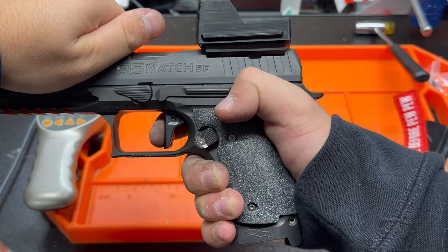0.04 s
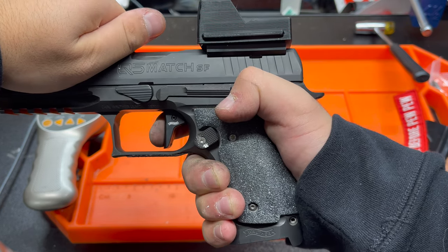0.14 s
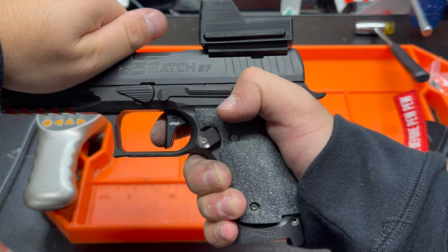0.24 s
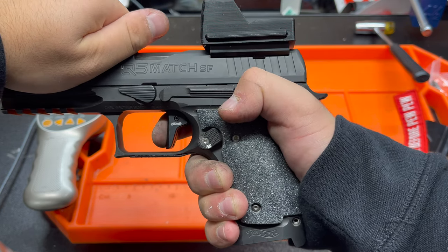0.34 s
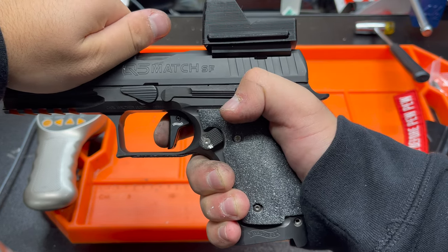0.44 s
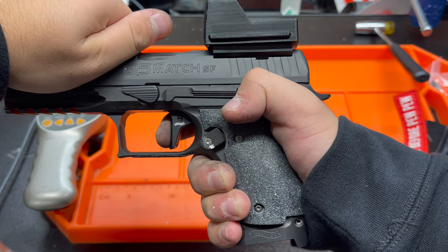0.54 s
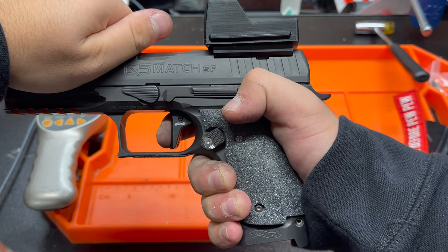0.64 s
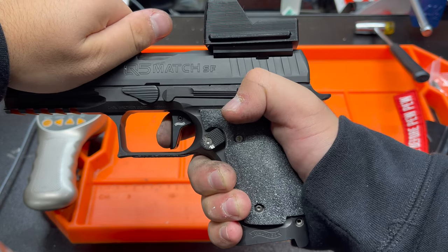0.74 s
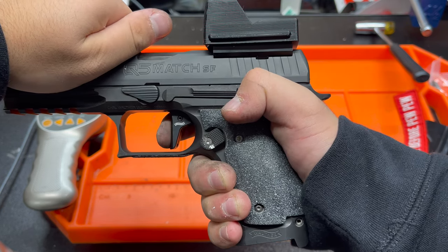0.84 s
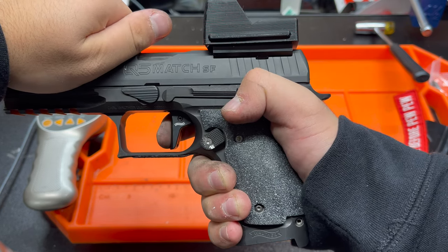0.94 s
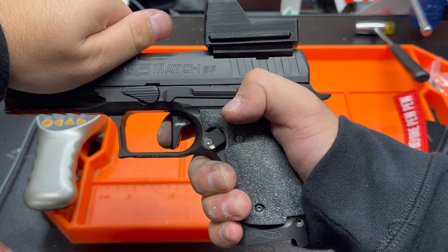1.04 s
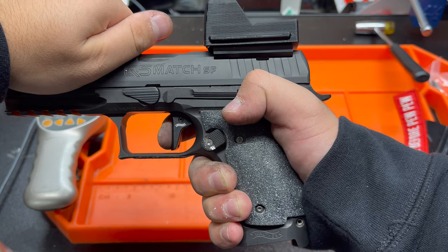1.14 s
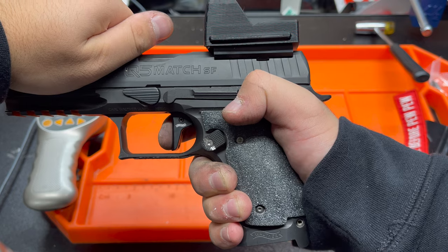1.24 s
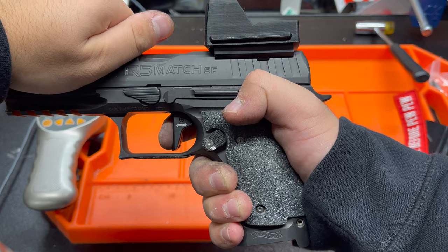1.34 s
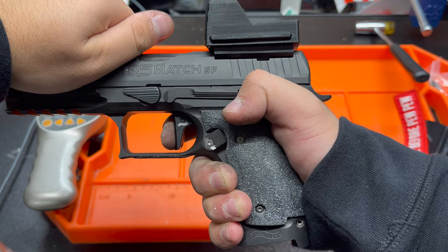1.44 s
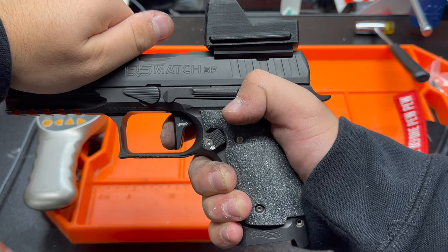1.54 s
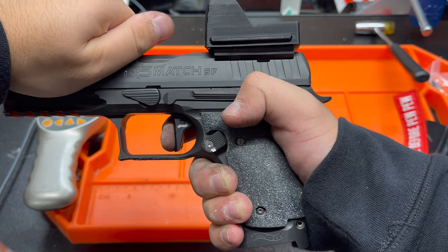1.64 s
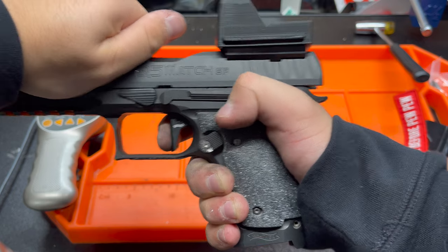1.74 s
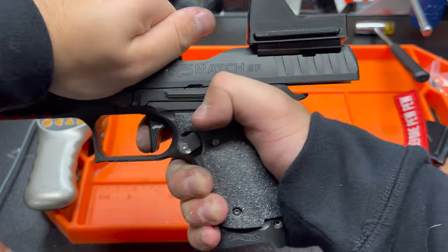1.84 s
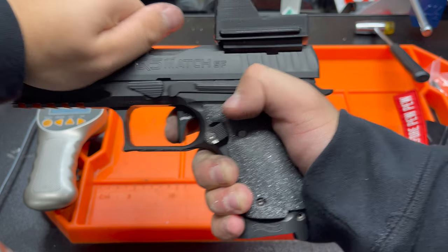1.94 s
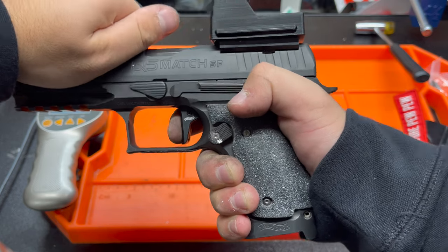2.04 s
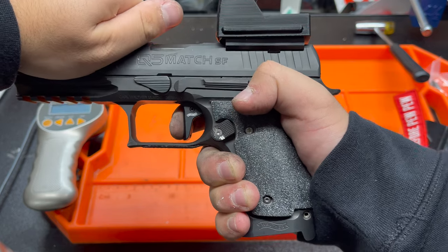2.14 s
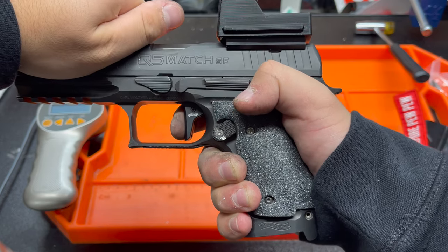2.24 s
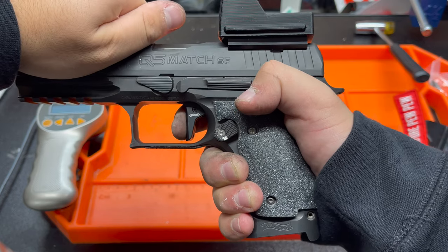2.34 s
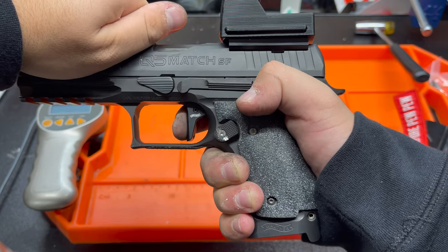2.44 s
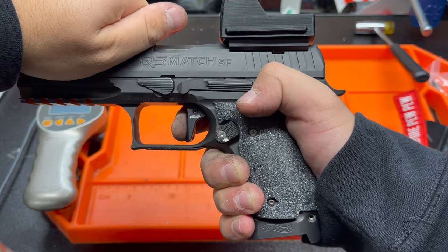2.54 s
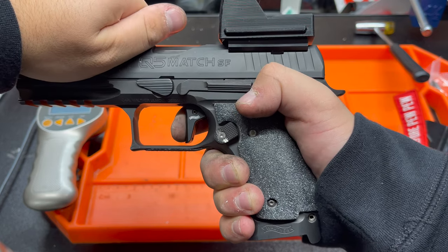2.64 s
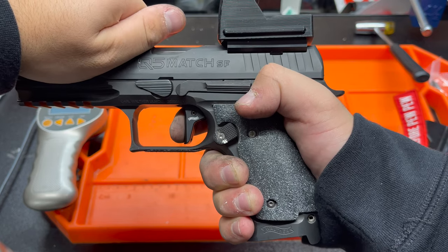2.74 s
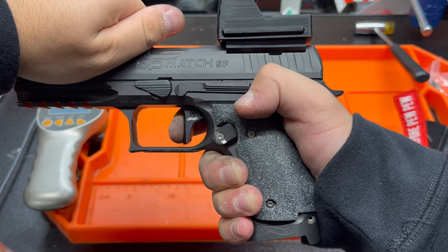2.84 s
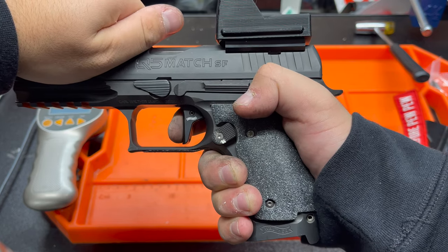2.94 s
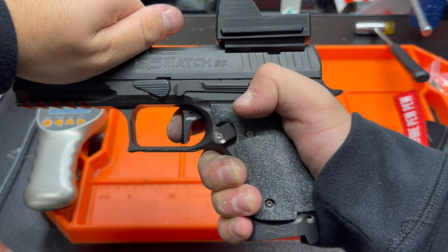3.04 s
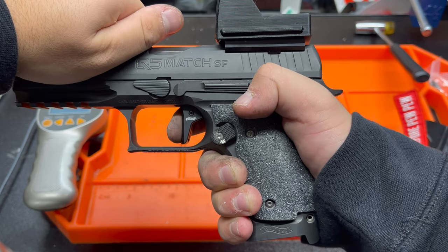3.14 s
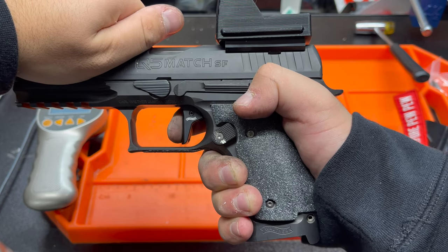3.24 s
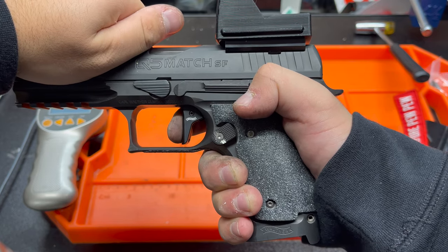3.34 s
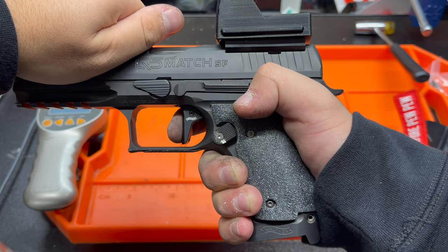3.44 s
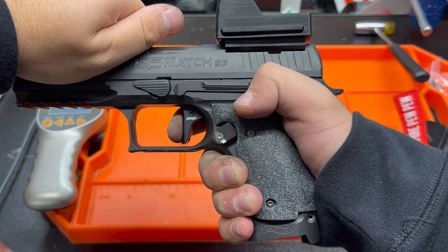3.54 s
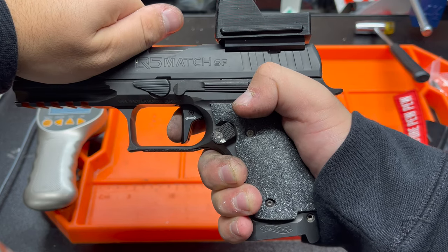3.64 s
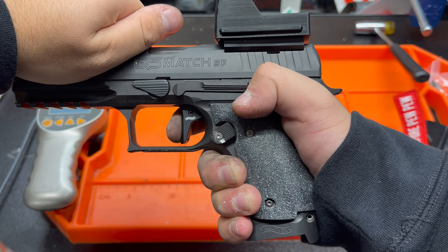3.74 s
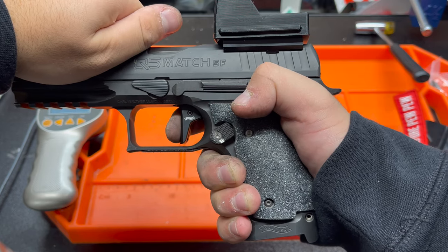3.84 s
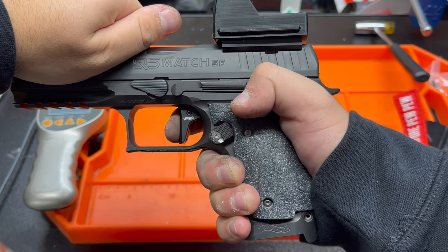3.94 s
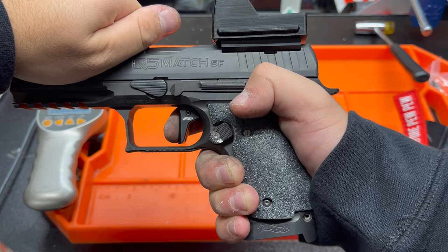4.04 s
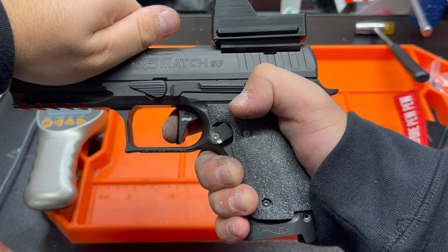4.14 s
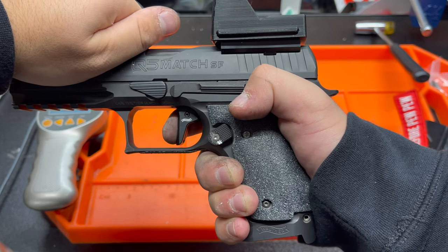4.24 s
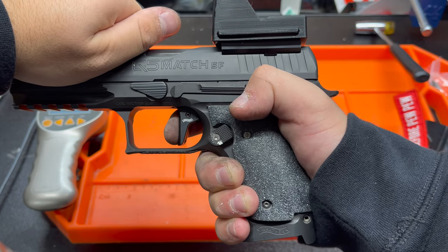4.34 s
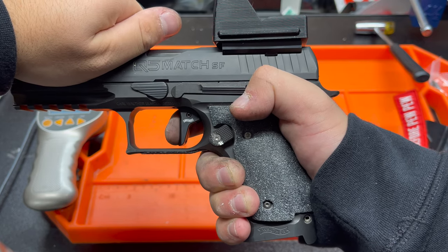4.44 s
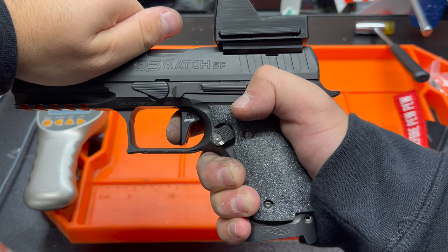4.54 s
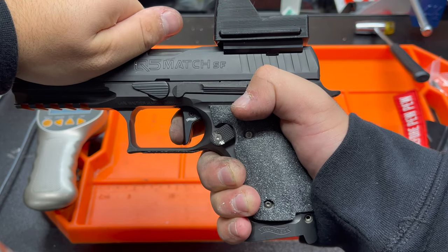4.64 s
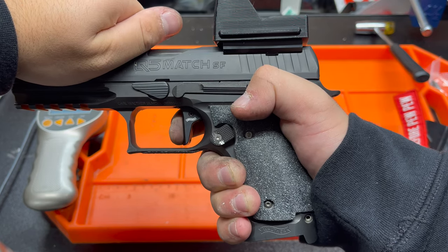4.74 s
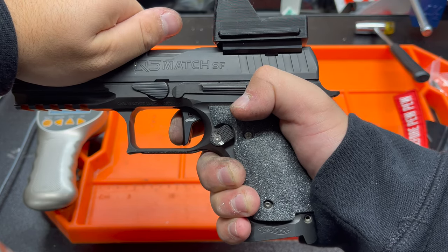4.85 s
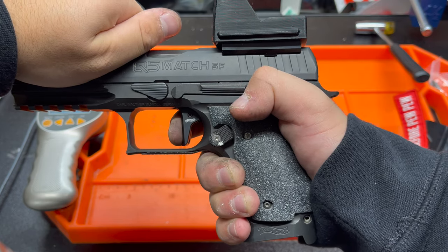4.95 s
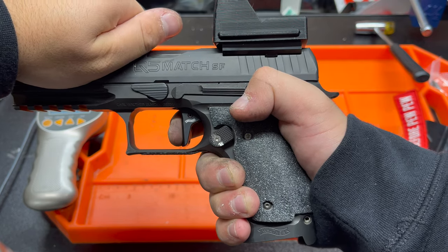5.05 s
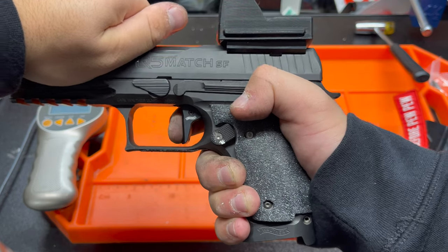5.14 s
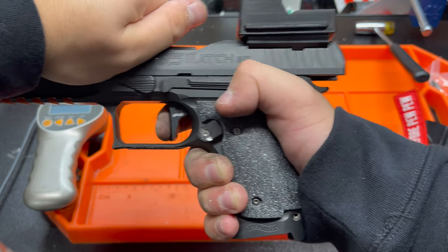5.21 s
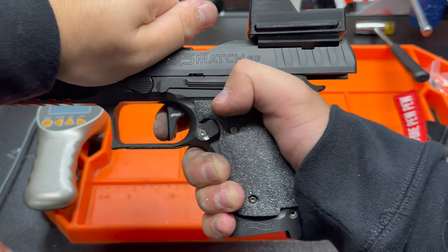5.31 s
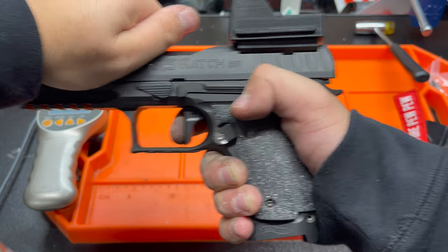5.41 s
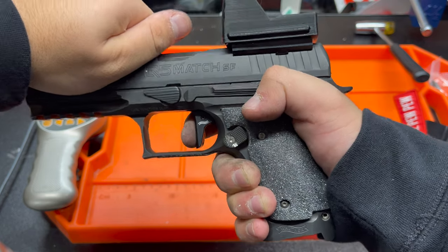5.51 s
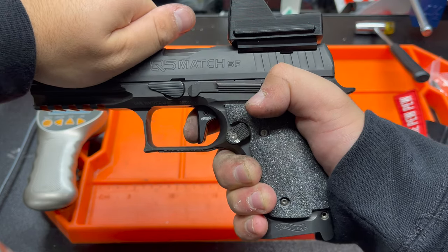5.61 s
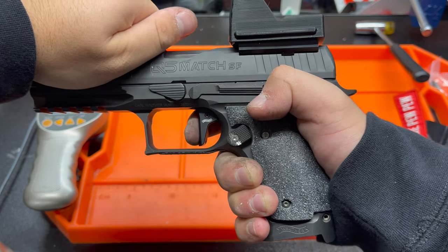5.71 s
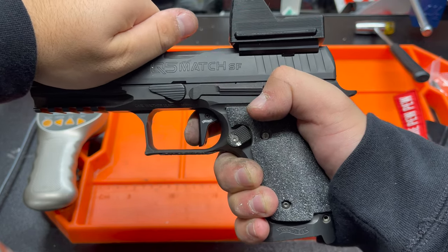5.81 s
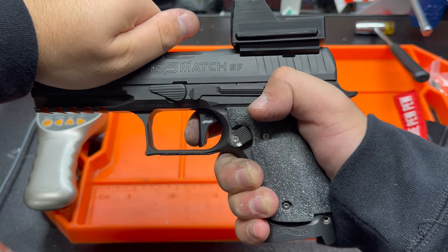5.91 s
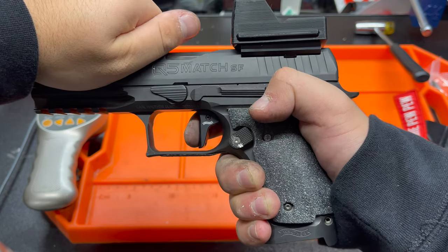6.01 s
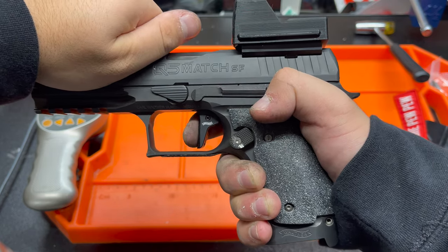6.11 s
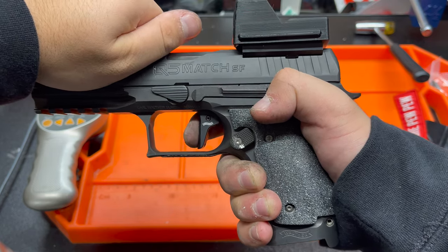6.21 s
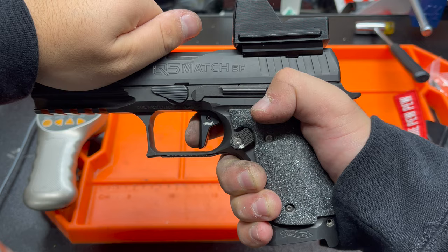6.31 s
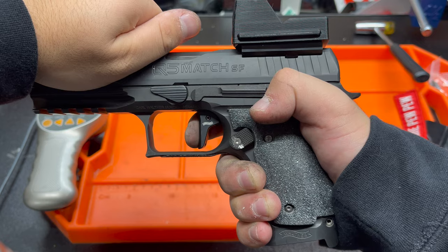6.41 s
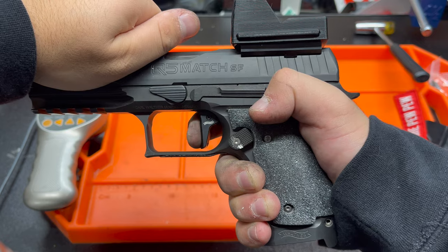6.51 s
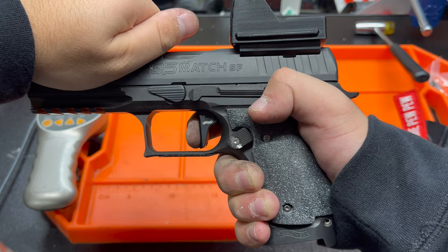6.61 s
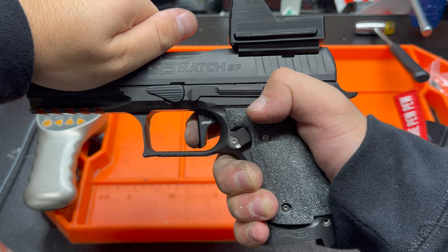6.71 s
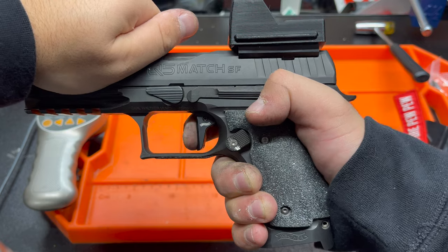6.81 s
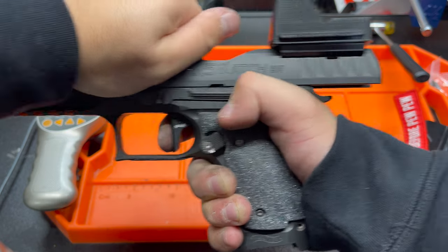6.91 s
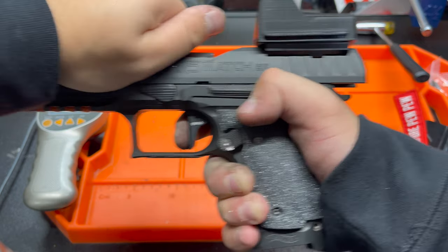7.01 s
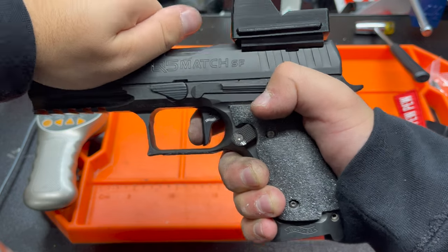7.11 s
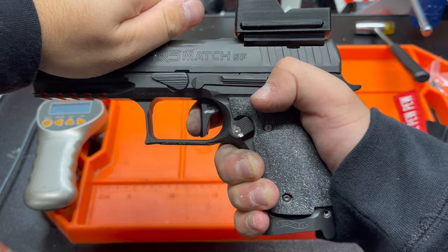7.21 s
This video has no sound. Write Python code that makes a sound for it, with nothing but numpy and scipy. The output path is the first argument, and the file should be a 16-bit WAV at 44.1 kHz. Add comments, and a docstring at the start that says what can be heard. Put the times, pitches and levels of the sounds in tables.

```python
"""A tick over faint mains hum and room tone: the trigger of a pistol resets, close to two microphone ports.
The striker then falls with a crack, and the slide is racked back and slams shut, in a small hard room.
Each contact is a few milliseconds of chatter that rings the modes of frame and slide; sliding steel is grit
through the same modes. Bench thuds, spring twang and soft low-mid noise swells lie under them; noise tails
are the room. A gain control ducks the loud passages."""
import sys
import numpy as np
from scipy import signal
from scipy.fft import rfft, irfft
from scipy.io import wavfile

SR = 44100
rng = np.random.default_rng(int(sys.argv[2]) if len(sys.argv) > 2 else 0)


def generate_wav(signal):
    """Clip the signal to [-1, 1] and save it as 16-bit WAV at the path in sys.argv[1]."""
    frames = np.transpose(np.atleast_2d(signal))
    scaled = np.clip(frames, -1, 1) * 32767
    pcm = np.round(scaled).astype(np.int16)
    wavfile.write(sys.argv[1], SR, pcm)


N = 320607

# Quickly damped modes of the gripped pistol: (frequency [Hz], relative level [dB], t60 [s])
LOW_MODES = [(904, -7.5, 0.0088), (1130, -0.5, 0.012), (1395, 4.5, 0.012), (1720, 0.5, 0.011),
             (2069, 4, 0.011), (2379, 3.5, .008), (2804, -1.5, 0.011)]
MIDDLE_MODES = [(3185, 0.53, 0.0034), (3780, -2.5, 0.0069), (4263, 0, 0.0059), (4903, -0.34, 0.0058),
                (5350, 0.96, .004), (6060, -1, .006), (6270, -2, 0.0098), (7000, -2, 0.0027)]
HIGH_MODES = [(7550, -10, 0.0034), (7587, -11, 0.0063), (8623, 0.5, 0.002), (8580, -16.5, 0.011),
              (9557, 8, 0.003), (10100, -3.5, 0.0061), (10700, -4, 0.0084), (12260, -14.5, 0.0072),
              (15000, -4.5, .004)]
# The steel slide's clink and its long thin rings: (frequency [Hz], relative level [dB], t60 [s])
SLIDE_RINGS = [(11040, 4, 0.02), (11540, -5, 0.003), (11260, -23, .24), (9080, -49, 0.7), (8560, -57, .8),
               (7800, -53, .7), (3870, -48, 1.2), (2862, -37, .9)]
# Small parts radiate little below: (low modes [Hz], middle modes [Hz], high modes [Hz], rings [Hz])
RADIATES_ABOVE_HZ = (700, 2411, 5900, 5930)
NEARNESS_DB = 14.5   # gain from a blow's energy to the level at the ports


def contacts():
    """Every contact is a short chatter that strikes all modes; rows: left, right, sound sent to the walls."""
    size = 3 * SR // 4
    mode_tables = (LOW_MODES, MIDDLE_MODES, HIGH_MODES, SLIDE_RINGS)
    groups = [radiated(modes, hz, size) for modes, hz in zip(mode_tables, RADIATES_ABOVE_HZ)]
    out = np.zeros((3, N + SR))
    ms = np.arange(1500) / SR * 1000
    for s, blow_db, low_db, middle_db, chatter_ms, ring_db, rise_ms in blows():
        shape = (1 - np.exp(-ms / rise_ms)) * np.exp(-(ms / chatter_ms) ** 2)
        chatter = grit(len(ms), uneven_db=2.5) * shape
        chatter /= np.sqrt(np.sum(chatter ** 2, axis=1, keepdims=True))
        # each blow strikes the modes a little differently; neighbours swing in opposite directions
        strengths = [from_db(rng.normal(0, 1.5, len(g))) * alternating(len(g)) for g in groups]
        low, middle, high, rings = [strength @ group for strength, group in zip(strengths, groups)]
        lower = from_db(low_db) * low + from_db(middle_db) * middle
        upper = high + from_db(ring_db) * rings
        sound = at_ports(chatter, lower, upper)
        at = round(s * SR)
        gain = from_db(blow_db + NEARNESS_DB)
        out[:2, at:at + sound.shape[1]] += gain * sound
        # averaged over all directions the chatter leaves no colour
        out[2, at:at + size] += gain * (lower + upper)
    return out[:, :N]


# Voice of a contact: (low modes re blow [dB], middle modes re blow [dB], chatter [ms], ring re blow [dB])
RESET_VOICE = (-15, -8.5, 3.4, -7.5)
SLIP_VOICE = (-14, -10, 4.5, -13)
STRIKER_VOICE = (-19, -9, 6, -9.5)
TICK_VOICE = (-8, -6, 4.5, -13)   # its lower modes are shifted by each tick's dullness
# Voices in the same columns, one row a stage: slack, unlock, barrel drops, striker catches
OPENING_VOICES = [(-14, -9, 2.5, -7), (-5, -3.5, 7.5, -10), (-8, -6.5, 8.5, -4), (-15.5, -2.8, 4.5, 0.4)]
# Likewise: barrel lifts, locks, slide seats
CLOSING_VOICES = [(-6, -4, 4, -6.5), (-14, -6, 4, -11), (-14, -4.7, 4.5, -0.6)]
# Knocks share only: (low modes re blow [dB], middle modes re blow [dB])
KNOCK_VOICE = (-4, -1.5)
# The trigger resets: (time [s], blow level [dB])
RESETS = [(0.1164, -20), (4.0728, -20), (6.012, -20)]
# The striker falls: (time [s], blow level [dB], sear slip level [dB], bench jolt level [dB])
STRIKER_FALLS = [(1.3645, -3.5, -19, -45), (4.5942, -3, -22, -40), (6.469, -2.2, -28, -46)]
# The slide is pulled open, four contacts a row: (time [s], blow level [dB])
OPENINGS = [
    [(1.6976, -27.5), (1.7036, -14.5), (1.7166, -7.5), (1.7328, -4.5)],
    [(5.1345, -34), (5.1416, -16.5), (5.155, -6), (5.1726, -7)],
    [(6.8055, -32), (6.8108, -14.5), (6.8226, -4), (6.8355, -13)],
]
# The slide slams shut, three contacts a row: (time [s], blow level [dB])
CLOSINGS = [
    [(1.9049, -27), (1.9106, -9), (1.9151, -6.5)],
    [(5.385, -26), (5.3905, -8.5), (5.3965, -7)],
    [(6.986, -26), (6.993, -4.5), (6.997, 2.2)],
]
# Knocks while the slide travels: (time [s], blow level [dB], chatter [ms], ring re blow [dB])
KNOCKS = [(1.7843, -19, 19.5, 1), (1.85, -26.5, 5.0, -10), (5.146, -15.5, 3.4, -11), (5.341, -36, 4.6, -5),
          (5.355, -33, 3.7, -12), (6.8545, -21, 8.8, 4), (6.8874, -19, 1.9, 3), (6.893, -11, 9.6, 1.5)]
# Faint ticks as the hands settle: (time [s], blow level [dB], dullness as extra low-mode level [dB])
TICKS = [(1.6263, -56, -.4), (1.6758, -64, 13), (4.2908, -70, -4), (5.0657, -59.5, 2.2), (5.1157, -64, 17),
         (6.3563, -84, 11), (6.763, -67, 9)]
SLIP_LEAD_S = .0032   # the sear slips this long before the striker lands
RISE_MS, STRIKER_RISE_MS = .57, 3   # how fast a chatter swells


def blows():
    """All contacts as rows (s, blow dB, low dB, middle dB, chatter ms, ring dB, rise ms)."""
    rows = [(s, db, *RESET_VOICE) for s, db in RESETS]
    rows += [(s - SLIP_LEAD_S, slip_db, *SLIP_VOICE) for s, _, slip_db, _ in STRIKER_FALLS]
    rows += staged(OPENINGS, OPENING_VOICES) + staged(CLOSINGS, CLOSING_VOICES)
    rows += [(s, db, *KNOCK_VOICE, ms, ring_db) for s, db, ms, ring_db in KNOCKS]
    low_db, middle_db, ms, ring_db = TICK_VOICE
    rows += [(s, db, low_db + dull_db, middle_db + dull_db / 2, ms, ring_db) for s, db, dull_db in TICKS]
    strikers = [(s, db, *STRIKER_VOICE, STRIKER_RISE_MS) for s, db, _, _ in STRIKER_FALLS]
    return [(*row, RISE_MS) for row in rows] + strikers


LOWER_FOLLOWS, RING_FOLLOWS = .55, .05   # share of extra blow dB that reaches the lower modes and the ring


def staged(moves, voices):
    """Contacts of a repeated move share the voice of their stage; extra force goes mostly into the treble."""
    usual_db = np.mean(moves, axis=0)[:, 1]
    rows = []
    for move in moves:
        for (s, db), (low_db, middle_db, ms, ring_db), usual in zip(move, voices, usual_db):
            lower_shift = (LOWER_FOLLOWS - 1) * (db - usual)
            ring_shift = (RING_FOLLOWS - 1) * (db - usual)
            rows.append((s, db, low_db + lower_shift, middle_db + lower_shift, ms, ring_db + ring_shift))
    return rows


def rubbing():
    """Grit between sliding steel faces excites the same modes."""
    size = SR // 8
    t = np.arange(N) / SR
    out = np.zeros((2, N))
    high = radiated(HIGH_MODES + SLIDE_RINGS[:3], RADIATES_ABOVE_HZ[2], size)
    high = rms_one(alternating(len(high)) @ high)
    low = radiated(LOW_MODES + MIDDLE_MODES, RADIATES_ABOVE_HZ[0], size)
    low = rms_one(alternating(len(low)) @ low)
    for stroke in strokes():
        s, treble_db, lower_db = np.transpose(stroke)
        span = np.flatnonzero((t >= s[0]) & (t < s[-1]))
        push = rms_one(grit(len(span), uneven_db=6.5)) / np.sqrt(size)
        treble = at_ports(push * from_db(np.interp(t[span], s, treble_db)), 0 * low, high)
        lower = at_ports(push * from_db(np.interp(t[span], s, lower_db)), low, 0 * high)
        sound = treble + lower
        out[:, span[0]:span[0] + sound.shape[1]] += sound[:, :N - span[0]]
    return out


# The slide rubs on its rails, harder with speed, one list a stroke: (time [s], treble level [dB])
RUB = [
    [(1.68, -72), (1.70, -53), (1.75, -47), (1.81, -50), (1.83, -58), (1.89, -47), (1.915, -44)],
    [(5.115, -76), (5.14, -63.5), (5.19, -53), (5.25, -62), (5.33, -71), (5.36, -53), (5.39, -46)],
    [(6.79, -74), (6.81, -58), (6.86, -49), (6.92, -46), (6.96, -50), (6.98, -48.5), (6.995, -40)],
]
RUB_LOWER_DB = -.6   # lower modes re treble
# The trigger bar creeps before a slow break:
# (start [s], end [s], first level [dB], last level [dB], treble re lower modes [dB])
CREEP = (4.535, 4.592, -89, -67, -15)


def strokes():
    """Rubbing as rows (s, treble dB, lower modes dB), one list a stroke."""
    start, end, first_db, last_db, treble_db = CREEP
    slide = [[(s, db, db + RUB_LOWER_DB) for s, db in stroke] for stroke in RUB]
    creep = [(start, first_db + treble_db, first_db), (end, last_db + treble_db, last_db)]
    return slide + [creep]


# The slide's travel felt through the bench: (low edge [Hz], high edge [Hz], level re rubbing [dB])
RUB_RUMBLE = (70, 560, -11)


def travel_rumble():
    """Low noise that follows the rubbing of the slide."""
    low_hz, high_hz, level_db = RUB_RUMBLE
    t, gain = np.arange(N) / SR, np.zeros(N)
    for stroke in RUB:
        s, rub_db = np.transpose(stroke)
        gain += from_db(np.interp(t, s, rub_db + level_db, left=-200, right=-200))
    band = signal.butter(2, [low_hz, high_hz], "band", fs=SR, output="sos")
    rumble = signal.sosfilt(band, gain * rng.standard_normal(N) + 1e-18)
    return rumble * np.sqrt(SR / 2 / (high_hz - low_hz))   # makes up for the narrow band


# Push through the bench, lows arriving last: (start pitch [Hz], end pitch [Hz], glide [ms], t60 [ms])
THUD = (620, 70, 4.6, 58)
# The hands jolt the bench as the slide moves: (time [s], level [dB])
RACK_JOLTS = [(1.715, -44), (1.915, -33), (5.157, -44), (5.398, -40), (6.825, -43), (6.894, -34),
              (6.998, -36)]
RESET_JOLT_DB = -43   # re the reset's blow
JOLT_LAG_S = .0035   # the bench answers the striker this much later


def thuds():
    """Dull pushes whose pitch drops at once."""
    start_hz, end_hz, glide_ms, t60_ms = THUD
    ms = np.arange(SR // 5) / SR * 1000
    hz = end_hz + (start_hz - end_hz) * np.exp(-ms / glide_ms)
    push = np.sin(2 * np.pi * np.cumsum(hz) / SR) * from_db(-60 * ms / t60_ms)
    jolts = np.zeros(N)
    reset_jolts = [(s, db + RESET_JOLT_DB) for s, db in RESETS]
    striker_jolts = [(s + JOLT_LAG_S, db) for s, _, _, db in STRIKER_FALLS]
    for s, level_db in reset_jolts + striker_jolts + RACK_JOLTS:
        jolts[round(s * SR)] = from_db(level_db)
    return signal.fftconvolve(jolts, push)[:N]


# Trigger spring coil modes: (frequency [Hz], relative level [dB], t60 [s])
SPRING_MODES = [(370, -6.5, 0.2), (500, -2.5, 0.08), (790, -7, .07), (1060, -4, .07)]
SPRING_DB = -35   # pluck re the reset's blow


def spring():
    """Low coil modes of the trigger spring twang after each reset."""
    plucks = np.zeros(N)
    for s, blow_db in RESETS:
        plucks[round(s * SR)] = from_db(blow_db + SPRING_DB)
    return signal.fftconvolve(plucks, decays(SPRING_MODES, SR // 3).sum(0))[:N]


# Decay of the room by pitch: (frequency [Hz], t60 [s])
ROOM_T60 = [(300, 0.36), (1200, 0.34), (3000, 0.37), (6000, 0.345), (9000, .31), (12000, 0.225)]
# Tone colour of the reverberant tail, dull above 12 kHz: (frequency [Hz], relative level [dB])
TAIL_COLOUR = [(300, -9), (1000, 1), (3000, 3), (7000, -2), (10000, -5), (11800, -2.5), (13000, -37.5)]
ROOM_DB, ROOM_ALIKE = -3.5, .3   # tail energy, share of it common to both ports
NEAR_DB, NEAR_T60_S = 7, 0.043   # reflections off bench and tray, re the room tail


def room(x):
    """Diffuse reflections: noise that dies at a rate of its own in each band, partly shared by the ports."""
    size = int(.7 * SR)
    t = np.arange(size) / SR
    edges = 200 * 2 ** np.arange(0, 6.6, .5)   # half-octave bands
    noise = rng.standard_normal((3, size))
    shared = np.array([noise[2], np.roll(noise[2], PORT_LAG)])
    noise = np.sqrt(1 - ROOM_ALIKE) * noise[:2] + np.sqrt(ROOM_ALIKE) * shared
    tail = 0
    for low, high in zip(edges, edges[1:]):
        t60 = at_hz(ROOM_T60, np.sqrt(low * high))
        sos = signal.butter(2, [low, high], "band", fs=SR, output="sos")
        band = signal.sosfilt(sos, np.roll(noise, round(low), axis=1))   # unrelated in neighbouring bands
        tail = tail + band * (from_db(-60 * t / t60) + from_db(NEAR_DB - 60 * t / NEAR_T60_S))
    tail = tail * (1 - np.exp(-t / .006))   # reflections build up
    hz = np.arange(size // 2 + 1) * SR / size
    tail = irfft(rfft(tail) * from_db(at_hz(TAIL_COLOUR, hz)), size)
    tail = tail * np.cos(np.pi / 2 * t * SR / size)   # and die out fully
    tail = from_db(ROOM_DB) * rms_one(tail) / np.sqrt(size)
    return signal.fftconvolve(x[:1], tail, axes=1)[:, :N]


# Soft low-mid noise that swells around the blows: (time [s], level [dB])
LOW_SWELLS = [(0.0, -89), (0.95, -92), (1.25, -82), (1.6, -80), (1.9, -77), (2.13, -76), (2.23, -92),
              (2.62, -85.5), (3.5, -94), (4.4, -91), (4.68, -79), (4.98, -88), (5.59, -79), (6.2, -88),
              (6.75, -91), (7.01, -75), (7.27, -72)]
# Its band: (low edge [Hz], high edge [Hz])
LOW_SWELLS_BAND = (256, 700)


def low_swells():
    """Patchy band-passed noise, partly shared by the ports."""
    s, level_db = np.transpose(LOW_SWELLS)
    band = signal.butter(2, LOW_SWELLS_BAND, "band", fs=SR, output="sos")
    mid, side = signal.sosfilt(band, rng.standard_normal((2, N)))
    gain = from_db(np.interp(np.arange(N) / SR, s, level_db) + 1.5 * drift(8.0))
    return gain * rms_one(mid + .6 * side * np.array([[1], [-1]]))


# Mains lines: (frequency [Hz], level [dB rms], waver [dB])
HUM_LINES = [(119.8, -62, .8), (240, -83, 1)]
# A narrow rumble below them: (centre [Hz], width [Hz], level [dB rms])
RUMBLE = (50, 4.2, -68)


def hum():
    """Mains lines that waver a little, and a narrow noise rumble below them; a touch louder on the right."""
    t = np.arange(N) / SR
    lines = np.zeros(N)
    for hz, level_db, waver_db in HUM_LINES:
        level = np.sqrt(2) * from_db(level_db + waver_db * drift(1.6))
        lines += level * np.sin(2 * np.pi * hz * t + .3 * drift(1.1))
    hz, width_hz, level_db = RUMBLE
    band = signal.butter(1, [hz - width_hz / 2, hz + width_hz / 2], "band", fs=SR, output="sos")
    rumble = signal.sosfilt(np.vstack([band, band]), rng.standard_normal(N + SR))[SR:]
    return (lines + from_db(level_db) * rms_one(rumble)) * from_db([[-.4], [.4]])


# Colour of the room tone: (frequency [Hz], relative density [dB])
FLOOR = [(25, -19.5), (60, -10.5), (90, -12.5), (160, -20.5), (220, -20), (320, -31.5), (600, -42),
         (1000, -46), (3000, -49.5), (10000, -54.5), (16000, -64.5)]
# Left-right likeness of the room tone: (frequency [Hz], correlation [-1 to 1])
FLOOR_ALIKE = [(60, 0.82), (200, .85), (350, .6), (650, 0.12)]
FLOOR_DB = -72   # rms


def room_tone():
    """Steady noise, alike at both ports in the bass only."""
    hz = np.arange(N // 2 + 1) * SR / N
    mid, side = rfft(rng.standard_normal((2, N))) * from_db(at_hz(FLOOR, hz))
    alike = at_hz(FLOOR_ALIKE, hz)
    both = irfft(np.sqrt(1 + alike) * mid + np.sqrt(1 - alike) * side * [[1], [-1]], N)
    return from_db(FLOOR_DB) * rms_one(both)


PORT_LAG = 15   # samples by which the treble reaches the right port later
LOW_ALIKE, LOW_LEAD = .55, 3   # lower modes: left-right likeness, samples by which the right port leads
RIGHT_DB, RIGHT_LOW_DB = 1.5, 4.5   # right port's gain for treble and lower modes


def at_ports(excite, low, high):
    """Treble reaches the right port a little late; lower modes radiate differently towards each port."""
    right_excite = LOW_ALIKE * excite[0] + np.sqrt(1 - LOW_ALIKE ** 2) * excite[1]
    treble = signal.fftconvolve(excite[0], high)
    left = treble + delayed(signal.fftconvolve(excite[0], low), LOW_LEAD)
    right_treble = from_db(RIGHT_DB) * delayed(treble, PORT_LAG)
    right_low = from_db(RIGHT_LOW_DB) * signal.fftconvolve(right_excite, low)
    return np.array([left, right_treble + right_low])


def grit(size, uneven_db):
    """Dense micro-contacts of uneven size and random sign; two unrelated rows."""
    sizes = from_db(uneven_db * np.minimum(rng.exponential(1, (2, size)), 4))
    return sizes * rng.choice([-1, 1], (2, size))


DULL_HZ = 12200   # the contacts are dull above this


def radiated(modes, low_hz, size):
    """Mode answers without their bass and treble skirts, scaled to unit energy together."""
    band = signal.butter(3, [low_hz, DULL_HZ], "band", fs=SR, output="sos")
    rows = signal.sosfilt(band, decays(modes, size))
    return rows / np.sqrt(np.sum(rows ** 2))


def decays(modes, size):
    """One decaying sine a row: the answer of each mode to a unit click, faded out at the end."""
    hz, level_db, t60 = np.transpose(modes)[:, :, None]
    t = np.arange(size) / SR
    fade = np.cos(np.pi / 2 * (t * SR / size) ** 2)
    return from_db(level_db - 60 * t / t60) * np.sin(2 * np.pi * hz * t) * fade


def alternating(count):
    """Signs +1, -1, +1 and so on."""
    return (-1) ** np.arange(count)


def drift(rate):
    """Slow random wander of rms 1, low-passed near a rate in Hz."""
    step = 40   # samples between drawn points
    r = np.exp(-2 * np.pi * rate * step / SR)
    noise = rng.standard_normal(N // step + 2002)
    slow = signal.lfilter([1], [1, -2 * r, r * r], noise)[2000:]
    return np.interp(np.arange(N) / step, np.arange(len(slow)), rms_one(slow))


def smooth(x, ms):
    """One-pole low-pass with a time constant in ms."""
    r = np.exp(-1000 / (ms * SR))
    return signal.lfilter([1 - r], [1, -r], x)


def delayed(x, count):
    """Shift later by whole samples."""
    return np.concatenate([np.zeros(count), x[:len(x) - count]])


def at_hz(points, hz):
    """Read a (Hz, value) table on a log-frequency axis."""
    table = np.array(points)
    return np.interp(np.log(np.maximum(hz, 1)), np.log(table[:, 0]), table[:, 1])


def from_db(db):
    """Amplitude factor of a level in dB."""
    return 10 ** (np.asarray(db) / 20)


def rms_one(x):
    """Scale to an rms of 1."""
    return x / np.sqrt(np.mean(x ** 2) + 1e-20)


def scene():
    """Direct sound of all sources, the room's answer to the pistol and bench, and the background."""
    struck, rubbed = contacts(), rubbing()
    jolted = thuds() + spring() + travel_rumble()
    direct = struck[:2] + rubbed + jolted * from_db([[-1.5], [1.5]])
    reflected = room(struck[2:] + rubbed[:1] + jolted)
    return direct + reflected + hum() + low_swells() + room_tone()


# Ducking: (threshold [dB], cut per dB over it [dB], level meter [ms], gain smoothing [ms])
GAIN_CONTROL = (-40.5, 0.4372, 10.5, 69)
MIC_LOW_HZ, CUTOFF_HZ = 34.2, 16800   # bottom and top cuts
TOP = .98   # ceiling that the peaks bend towards


def record(dry):
    """Gain control ducks under loud passages and recovers; bottom and top are cut."""
    threshold_db, slope, meter_ms, smoothing_ms = GAIN_CONTROL
    level_db = 10 * np.log10(smooth(np.mean(dry ** 2, axis=0), meter_ms) + 1e-12)
    over_db = np.maximum(level_db - threshold_db, 0)
    ducked = dry * from_db(-slope * smooth(over_db, smoothing_ms))
    ducked = signal.sosfilt(signal.butter(4, MIC_LOW_HZ, "high", fs=SR, output="sos"), ducked)
    rounded = TOP * np.tanh(ducked / TOP)   # the sharpest peaks are rounded
    return signal.sosfilt(signal.cheby2(12, 80, CUTOFF_HZ, fs=SR, output="sos"), rounded)


dry = scene()
out = record(dry)
generate_wav(out)
```